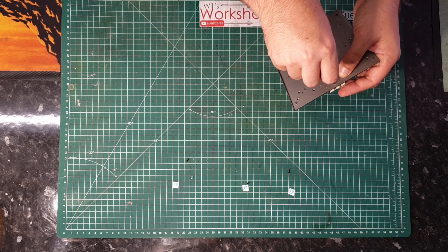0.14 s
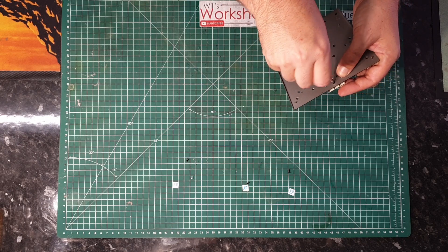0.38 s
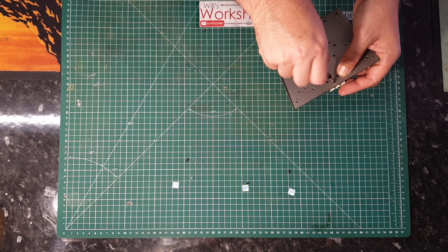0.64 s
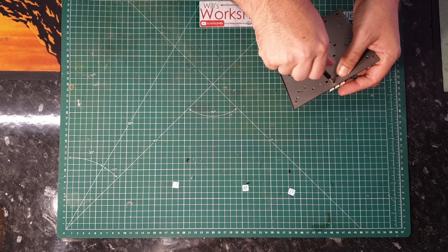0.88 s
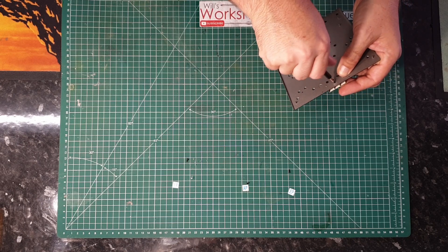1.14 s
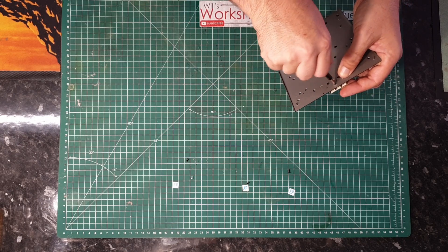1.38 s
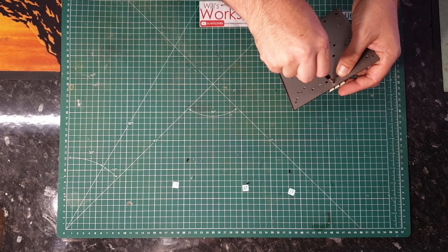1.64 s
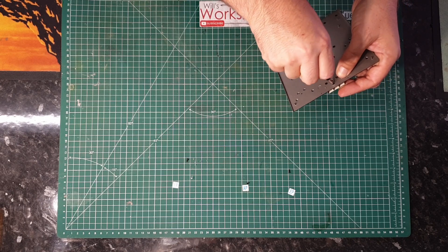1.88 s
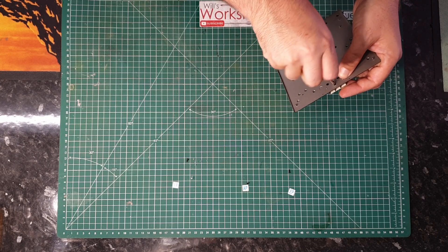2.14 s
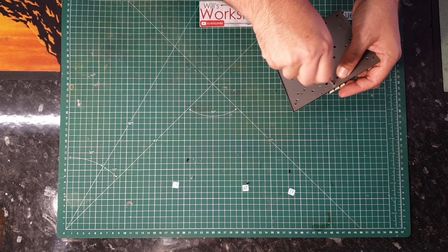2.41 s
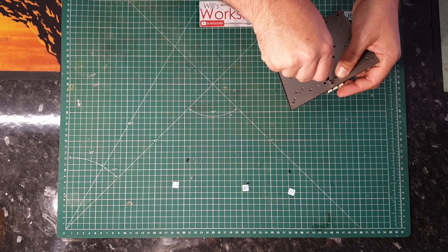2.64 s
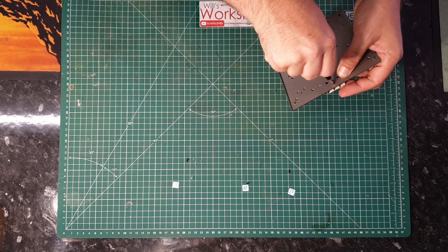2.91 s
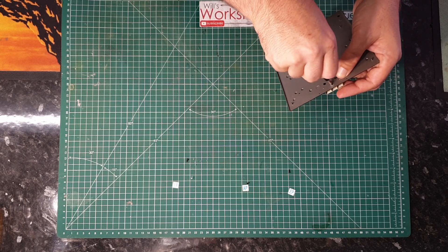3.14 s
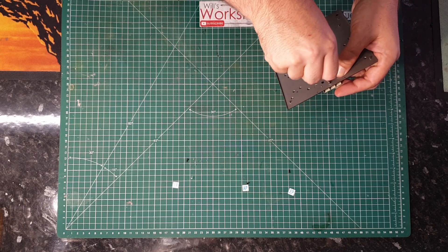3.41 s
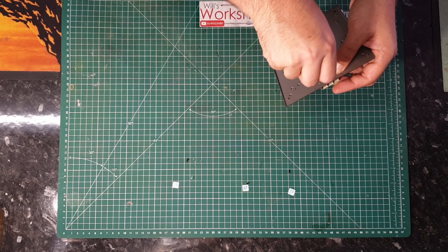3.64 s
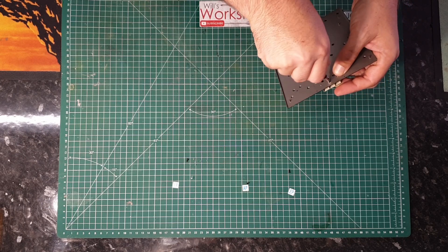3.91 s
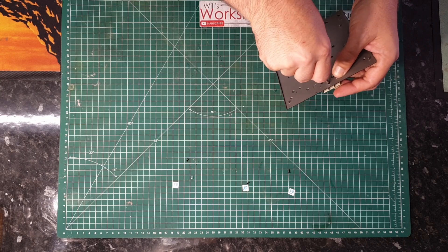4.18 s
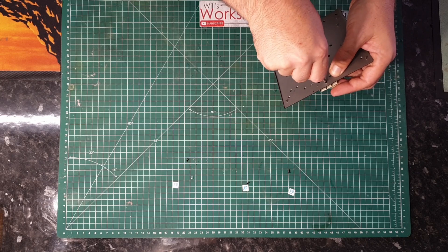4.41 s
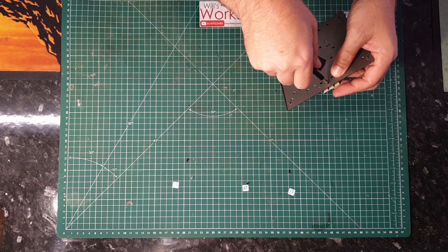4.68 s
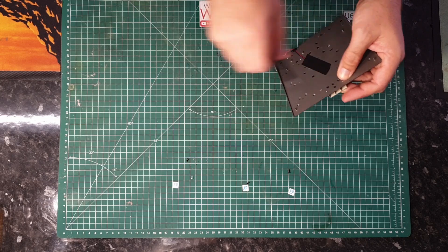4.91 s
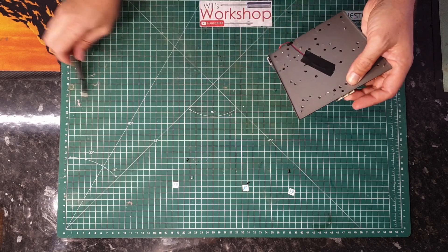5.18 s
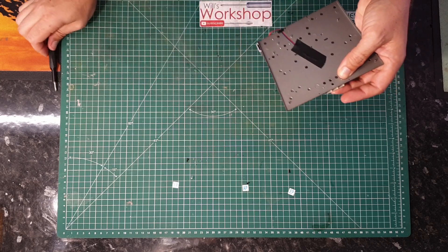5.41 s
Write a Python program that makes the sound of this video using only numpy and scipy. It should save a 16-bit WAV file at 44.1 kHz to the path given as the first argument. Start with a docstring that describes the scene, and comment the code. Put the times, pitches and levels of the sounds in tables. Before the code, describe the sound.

Over a low appliance hum, a hand tool quietly ticks and rubs on plastic, then lands loudly on a hard counter, rattling briefly.

```python
"""A room with a stone worktop: fingers turn a small screwdriver in a thin plastic panel on a cutting mat. Each
regrip ticks (noise burst), creaks and thuds (struck modes); rubbing is noise with one gliding squeak. The
driver drops on the worktop, bounces and rattles (modes and noise); then something drier clacks on the worktop.
An appliance hums (beating and wavering sines) and rumbles (noise); a small microphone adds hiss and colour."""
import sys
import numpy as np
from scipy import signal
from scipy.fft import rfft, irfft, next_fast_len
from scipy.io import wavfile

SR = 44100
rng = np.random.default_rng(int(sys.argv[2]) if len(sys.argv) > 2 else 0)


def to_wav(s):
    """Save 16-bit WAV."""
    ch = np.atleast_2d(s).T  # columns
    pcm = np.round(np.clip(ch, -1, 1) * 32767)  # PCM
    wavfile.write(sys.argv[1], SR, pcm.astype(np.int16))


def how_loud(loudness_db):
    """Turn decibels into a plain amplitude multiplier (0 dB gives 1, 20 dB gives 10)."""
    steps = np.asarray(loudness_db, float) / 20
    return 10 ** steps


N = 244578

# driver modes: f/Hz, level/dB, t60/s
DRIVER_MODES = [(160, -7, 0.065), (261, 9, 0.11), (350, 2, 0.035), (452, -4, 0.045), (1037, -13.5, 0.047),
                (1165, 1, 0.055), (1770, 5, 0.02), (1857, 5, 0.023), (1996, -2.5, 0.031), (2380, 4, 0.017),
                (2560, -16, 0.018), (2700, -4.5, 0.037), (3000, 7, 0.0071), (3270, -4, 0.018),
                (3970, -3.5, 0.025), (4304, -2, 0.033), (9140, -2, 0.014), (11100, 8.5, 0.0078)]
# dry crack of a blow, relative density: f/Hz, level/dB
CRACK_SPECTRUM = [(500, -3.5), (1000, -8.5), (2400, 1.5), (3500, -17), (4400, -3), (5600, -15), (7000, -13),
                  (8300, -12), (10000, 1.5), (11500, -6), (13000, -11), (15500, -16)]
BLOW_CHATTER_S = 0.0013   # mean delay of a blow's after-clicks


def rms_one(x):
    """Scales to rms 1."""
    return x / np.sqrt(np.mean(x ** 2) + 1e-20)


def in_time(rows):
    """Joins curve rows by straight lines, one value a sample."""
    s, *columns = np.transpose(rows)
    return [np.interp(np.arange(N) / SR, s, c) for c in columns]


def at_hz(points, hz):
    """Reads a table on a log-frequency axis."""
    table_hz, values = np.array(points)[:, :2].T
    return np.interp(np.log(hz), np.log(table_hz), values)


def coloured(spectrum, size=N):
    """Noise with the given spectrum, rms 1."""
    pad = next_fast_len(size)
    hz = np.maximum(np.arange(pad // 2 + 1) * SR / pad, 1)
    shaped = rfft(rng.standard_normal(pad)) * how_loud(at_hz(spectrum, hz))
    return rms_one(irfft(shaped, pad)[:size])


def lowpass_noise(cutoff_hz, shape):
    """Slow random wander: white noise through a second-order lowpass."""
    sos = signal.butter(2, cutoff_hz, fs=SR, output="sos")
    return signal.sosfilt(sos, rng.standard_normal(shape))


def ring(x, hz, t60_s):
    """Two-pole resonator: a unit click sets a sine of height 1 ringing."""
    r = how_loud(-60 / (t60_s * SR))
    w = 2 * np.pi * hz / SR
    return signal.lfilter([0, np.sin(w)], [1, -2 * r * np.cos(w), r * r], x + 1e-18)


def chatter(mean_delay_s, draw, first, count=12):
    """A contact is a first click and a few uneven, fading after-clicks; energy 1."""
    clicks = np.zeros(int(.03 * SR))
    when = np.minimum(draw[:count] * mean_delay_s * 2, .029) * SR
    heights = (draw[count:] - .5) * 2 * np.exp(-draw[:count])
    np.add.at(clicks, when.astype(int), heights)
    clicks[0] += first
    return clicks / np.sqrt(np.sum(clicks ** 2))


def strike(clicks, modes, spread_db):
    """One contact rings every mode with a strength of its own; peak 1."""
    x = np.concatenate([clicks, np.zeros(int(.15 * SR))])
    luck = rng.normal(0, 1, len(modes))
    sound = 0
    for k, (hz, db, t60_s) in enumerate(modes):
        sound = sound + (-1) ** k * how_loud(db + spread_db * luck[k]) * ring(x, hz, t60_s)
    return sound / np.max(np.abs(sound))


def grit(spectrum, fade_s, rise_s, snap=0):
    """Countless tiny fast-dying modes: coloured noise swells and fades, with optional snap; height about 1."""
    t = np.arange(int(.08 * SR)) / SR
    fade = np.exp(-t / fade_s) + snap * np.exp(-t / 0.002)
    shape = fade * (1 - np.exp(-t / rise_s))
    sound = coloured(spectrum, size=len(t)) * shape
    return sound * np.sqrt(np.sum(shape ** 2) / np.sum(sound ** 2)) / 2


def add(out, at, sound):
    """Mixes a sound in at a sample."""
    out[at:at + len(sound)] += sound[:N - at]


def regrips():
    """The bit slips in the screw head: the steel scrapes, the panel creaks, the mat thuds."""
    # regrips: t/s, steel level/dB, panel level/dB, mat level/dB, steel tick f/Hz
    ticks = [(0.38, -62.5, -56, -62.5, 10100), (0.471, -62.5, -56.5, -55, 10200),
             (0.6461, -66, -58, -56.5, 10900), (0.7228, -68, -59, -69, 10900),
             (0.9282, -55, -55, -50, 10720), (0.996, -65, -59.5, -70, 10400),
             (1.019, -58, -59.5, -71, 11100), (1.2035, -66, -59, -54.5, 10200),
             (1.289, -68, -61, -66, 11600), (1.305, -65, -53, -68, 10700), (1.4988, -57, -58.5, -56, 10500),
             (1.797, -65, -53, -56, 10600), (1.8055, -58, -58, -71, 10200),
             (1.871, -57.5, -52.5, -58, 9920), (2.102, -72, -49.5, -63, 9500),
             (2.1074, -53.5, -45.5, -50.5, 10600), (2.178, -59, -53, -73, 10000),
             (2.193, -67, -60, -65, 11200), (2.419, -68, -56, -78, 10100),
             (2.4301, -54.5, -53, -45.5, 9840), (2.494, -68, -59.5, -64, 9050),
             (2.513, -63, -60, -65, 10100), (2.7186, -67, -60, -54.5, 9490),
             (2.728, -58.5, -53, -51.5, 9600), (2.818, -66, -54.5, -68, 10600),
             (3.043, -59.5, -54.5, -49.5, 9400), (3.0553, -58.5, -57, -49.5, 11100),
             (3.3513, -70, -54.5, -55.5, 10300), (3.424, -68, -63, -58, 11100),
             (3.441, -76, -73, -55.5, 12000), (3.529, -66, -63, -72, 11100), (3.65, -70, -55, -69, 10700),
             (3.7099, -65, -59, -81, 10200), (3.726, -67, -62, -64, 10900), (4.004, -65, -54.5, -72, 12260),
             (4.0559, -76, -57, -65, 12550), (4.085, -78, -58, -53, 12000)]
    # panel modes under the screw: f/Hz, level/dB, t60/s
    panel_modes = [(1490, -5, 0.028), (1940, -10, 0.0067), (2040, -0.5, 0.011), (2326, 2, 0.028),
                   (2640, 6, 0.0081), (3320, -6, 0.041), (3700, -21, 0.031), (4300, -14.5, 0.012),
                   (4930, -8, 0.0096)]
    # mat modes under the screw: f/Hz, level/dB, t60/s
    mat_modes = [(265.6, -2, 0.056), (415, -5.5, 0.04), (476.5, -0.5, 0.056), (565, 5, 0.018),
                 (725, -5, 0.0054)]
    # panel creak, relative density: f/Hz, level/dB
    creak_spectrum = [(300, -25), (900, -4), (1500, -12.5), (2000, -2.5), (2400, 7), (3300, -2), (4000, -7),
                      (5200, -19), (7000, -20)]
    slip_chatter_s, scrape_fade_s, creak_fade_s = 0.0062, 0.021, 0.028
    creak_re_panel_db = -0.5
    out = np.zeros(N)
    draws = rng.random((len(ticks), 24))
    for (s, steel_db, panel_db, mat_db, hz), draw in zip(ticks, draws):
        at = round(s * SR)
        clicks = chatter(slip_chatter_s, draw, first=0.76)
        steel = [(0.45 * hz, -30), (0.79 * hz, -16), (0.9 * hz, 0),
                 (1.12 * hz, -1), (1.15 * hz, -10), (1.2 * hz, -14)]
        creak = grit(creak_spectrum, creak_fade_s, rise_s=0.0013)
        add(out, at, how_loud(steel_db) * grit(steel, scrape_fade_s, rise_s=0.0003, snap=1.66))
        add(out, at, how_loud(panel_db) * strike(clicks, panel_modes, spread_db=2.5))
        add(out, at, how_loud(panel_db + creak_re_panel_db) * creak)
        add(out, at, how_loud(mat_db) * strike(clicks, mat_modes, spread_db=2.0))
    return out


def drops():
    """Each blow weighs ring, clack, clank and treble in its own way; the thud goes with the ring."""
    # blows on the worktop: t/s, level/dB, then balance: ring/dB, clank/dB, treble/dB
    blows = [(5.174, -15.5, -8, -3, -12), (5.1788, -28, 1, -28, 0), (5.1847, -32, 1, -26, -1),
             (5.2153, -21, -7.5, -12, -14)]
    middle_db, thud_db, crack_db = -6.5, -9, -0.5
    middle = [m for m in DRIVER_MODES if 600 < m[0] < 1300]
    low = [m for m in DRIVER_MODES if m[0] < 600]
    out = np.zeros(N)
    draws = rng.random((len(blows), 24))
    for (s, db, ring_db, clank_db, treble_db), draw in zip(blows, draws):
        tilt = [(700, ring_db), (1300, ring_db), (1600, 0), (3300, 0),
                (3800, clank_db), (6000, clank_db), (8000, treble_db)]
        at = round(s * SR)
        clicks = chatter(BLOW_CHATTER_S, draw, first=3.3)
        upper = [(f, d + at_hz(tilt, f), t) for f, d, t in DRIVER_MODES if f > 1300]
        crack = [(f, d + at_hz(tilt, f)) for f, d in CRACK_SPECTRUM]
        add(out, at, how_loud(db) * strike(clicks, upper, spread_db=-0.6))
        add(out, at, how_loud(db + ring_db + middle_db) * strike(clicks, middle, spread_db=1.5))
        add(out, at, how_loud(db + ring_db + thud_db) * strike(clicks, low, spread_db=1.0))
        add(out, at, how_loud(db + crack_db) * grit(crack, 3.5 * BLOW_CHATTER_S, rise_s=0.00048))
    return out


def rattling():
    """After a blow the driver rattles on: it sets in, sags while it holds, then dies quickly."""
    # rattle onsets: t/s
    starts_s = [5.18, 5.212, 5.381, 5.416, 5.45]
    # rattles, one an onset: level/dB, hold/s, upper band balance/dB
    rattles = [(-64, .03, 0), (-43, 0.046, 10), (-53.5, 0.014, -17), (-43.5, 0.006, 4.5), (-56.5, 0.092, 0)]
    rise_s, sag_db_per_s, stop_db_per_s = 0.0041, 134, 404
    grains = (rng.random(N) < 1500 / SR) * rng.standard_normal(N)   # about 1500 contacts/s
    modes = [m for m in DRIVER_MODES if 900 < m[0] < 5000]
    ringing = rms_one(sum(how_loud(d) * ring(grains, f, t60_s) for f, d, t60_s in modes))
    scuff = coloured([(f, d - 15.0 * (f > 5000)) for f, d in CRACK_SPECTRUM])
    upper = coloured([(1900, -27), (2500, -1.0), (3200, 0.5), (4500, -9), (5500, -14.5), (6500, -24)])
    out = 0
    for s, (db, hold_s, upper_db) in zip(starts_s, rattles):
        t = np.maximum(np.arange(N) / SR - s, 0)
        sag_db = sag_db_per_s * np.minimum(t, hold_s)
        stop_db = stop_db_per_s * np.maximum(t - hold_s, 0)
        envelope = how_loud(db - sag_db - stop_db) * np.minimum(t / rise_s, 1)
        out = out + envelope * (0.44 * ringing + 0.58 * scuff + 0.45 * how_loud(upper_db) * upper)
    return out


def clacks():
    """Something drier clacks on the worktop: a light touch, then a clack with two rebounds."""
    # contacts: t/s, level/dB, crack re level/dB
    contacts = [(5.3817, -46, 8.5), (5.4153, -27, -0.5), (5.42, -31, 1), (5.4287, -44.5, 3)]
    # clack modes: f/Hz, level/dB, t60/s
    clack_modes = [(288, -8, 0.036), (485, -6.5, .04), (998, -2.5, 0.028), (1663, -4.5, .03),
                   (2160, -6, 0.022), (2370, -0.5, .03), (3190, -3, 0.03), (3940, 0.5, 0.033),
                   (4700, -11, .02), (5660, -1.5, 0.017)]
    out = np.zeros(N)
    draws = rng.random((len(contacts), 24))
    for (s, db, crack_db), draw in zip(contacts, draws):
        at = round(s * SR)
        clicks = chatter(BLOW_CHATTER_S, draw, first=3.4)
        add(out, at, how_loud(db) * strike(clicks, clack_modes, spread_db=2.0))
        add(out, at, how_loud(db + crack_db) * grit(CRACK_SPECTRUM, 0.0052, rise_s=0.00028))
    return out


def rubbing():
    """Skin drags over the panel; once the thread binds and squeaks, a narrow band of noise gliding up."""
    # finger rubbing: t/s, level/dB
    rub_level = [(0, -72), (.45, -68.5), (.5, -66.5), (.8, -70.5), (1.6, -70), (2.15, -73), (2.32, -69),
                 (2.9, -72.5), (3.15, -67), (3.36, -71), (3.93, -71), (5.15, -75)]
    # rubbing, relative density: f/Hz, level/dB
    rub_spectrum = [(900, -35), (1400, -2), (1950, -14.5), (2200, 1), (2400, 4), (2650, -2.5), (3050, -0.5),
                    (3500, -16), (4300, -24), (6000, -31.5)]
    # thread squeak: t/s, f/Hz, level/dB
    squeak_curve = [(.52, 3350, -90), (.56, 3450, -77), (.63, 3520, -71.5), (.69, 3600, -73.5),
                    (.73, 3620, -85)]
    squeak_hz, squeak_db = in_time(squeak_curve)
    wobble = lowpass_noise(110, (2, N))
    phase = 2 * np.pi * np.cumsum(squeak_hz) / SR
    squeak = rms_one(wobble[0] * np.sin(phase) + wobble[1] * np.cos(phase))
    patchy_db = 1.4 * rms_one(lowpass_noise(9.0, N))   # uneven pressure
    rub = how_loud(in_time(rub_level)[0] + patchy_db) * coloured(rub_spectrum)
    return rub + how_loud(squeak_db) * squeak


def appliance():
    """The rotor runs just under half mains speed, so their lines beat; others waver over a broad rumble."""
    # mains lines: multiple of mains, peak level/dB
    mains_lines = [(1, -62), (2, -57.5)]
    # rotor lines: multiple of rotor speed, peak level/dB
    rotor_lines = [(2, -63), (4, -66)]
    # rotor's third line swells and fades: t/s, rms level/dB
    third_line = [(0, -63), (.2, -64), (.47, -81), (.75, -66), (2.4, -66), (3.2, -73), (4.4, -70),
                  (5.0, -60), (5.2, -59), (5.38, -50.5), (5.47, -66), (5.55, -66)]
    # wavering lines: f/Hz, level/dB, pole width/Hz
    wavering_lines = [(120.7, -68.5, 1.3), (193.1, -70.5, 2.9), (286.6, -74.5, 2.2)]
    # rumble, relative density: f/Hz, level/dB
    rumble_spectrum = [(13, -29), (24, -20), (38, -4.5), (102, -3), (151, -7.5), (289, -11.5), (325, -11.5),
                       (422, -16.5), (480, -20), (700, -24.5), (910, -51), (1540, -120)]
    # rumble: t/s, level/dB
    rumble_level = [(0, -58.5), (.41, -63.5), (.74, -57.5), (1.08, -64.5), (1.31, -60.5), (2.61, -61.5),
                    (2.8, -67), (3.1, -62.5), (4.05, -60), (4.32, -66), (4.7, -63), (5.55, -58.5)]
    mains_hz, rotor_hz = 50.0, 24.565
    cancel_s = 0.49   # rotor and mains lines stand opposed here
    phase = 2 * np.pi * (np.arange(N) / SR - cancel_s)   # of 1 Hz
    hum = sum(how_loud(db) * np.sin(k * mains_hz * phase) for k, db in mains_lines)
    hum = hum - sum(how_loud(db) * np.sin(k * rotor_hz * phase) for k, db in rotor_lines)
    hum = hum + np.sqrt(2) * how_loud(in_time(third_line)[0]) * np.sin(rotor_hz * phase * 3)
    for hz, db, width_hz in wavering_lines:
        r = np.exp(-np.pi * width_hz / SR)
        noise = rng.standard_normal((2, N + SR))
        waver = signal.lfilter([1], [1, -2 * r, r * r], noise)[:, SR:]   # first second settles
        waver = 0.46 * waver / np.std(waver)
        hum = hum + how_loud(db) * ((1 + waver[0]) * np.sin(hz * phase) + waver[1] * np.cos(hz * phase))
    return hum + how_loud(in_time(rumble_level)[0]) * coloured(rumble_spectrum)


def hiss():
    """Steady microphone hiss: coloured noise."""
    # hiss, relative density: f/Hz, level/dB
    hiss_spectrum = [(290, -23.5), (500, -1.5), (561, -6), (586, 0.5), (648, -8.5), (749, -3.5),
                     (1370, -13.5), (1630, -10), (2240, -11), (3210, -11), (5100, -22.5), (7000, -31),
                     (8820, -26), (12100, -17), (15700, -20)]
    return how_loud(-68.5) * coloured(hiss_spectrum)


def microphone_port(x):
    """The sound port loses a broad band near 7 kHz."""
    sos = signal.butter(1, [6000, 8000], "bandstop", fs=SR, output="sos")
    return 0.63 * signal.sosfilt(sos, x) + 0.34 * x


def room(x):
    """Dense echoes after a few milliseconds, each band dying at its own rate; echo energy 1."""
    # reverberation: f/Hz, t60/s
    room_t60 = [(200, 0.2), (500, 0.39), (1400, 0.2), (3700, 0.21), (10000, 0.24)]
    t = np.arange(int(.5 * SR)) / SR
    edges_hz = 100 * 2.0 ** np.arange(8.3)   # octaves
    tail = 0
    for low, high in zip(edges_hz, np.minimum(edges_hz[1:], .45 * SR)):
        sos = signal.butter(2, [low, high], "band", fs=SR, output="sos")
        band = signal.sosfilt(sos, rng.standard_normal(len(t)))
        tail = tail + band * how_loud(-60 * t / at_hz(room_t60, np.sqrt(low * high)))
    tail = tail * np.clip((t - .003) / 0.0073, 0, 1)
    return signal.fftconvolve(x, tail / np.sqrt(np.sum(tail ** 2)))[:N]


def scene():
    """Contacts ring in the room over rubbing, hum and hiss."""
    room_db = -6.5
    contacts = microphone_port(regrips() + drops() + clacks() + rattling())
    mix = contacts + how_loud(room_db) * room(contacts) + rubbing() + appliance() + hiss()
    return mix[None]


def top_cut(x):
    """Nothing passes above the cut-off."""
    return signal.sosfilt(signal.butter(12, 16510, fs=SR, output="sos"), x)


def record(dry):
    """Filters cut the top above 15.72 kHz and the bass below 35 Hz."""
    lowpass = signal.ellip(10, .5, 60, 15720, fs=SR, output="sos")
    highpass = signal.butter(2, 35, "high", fs=SR, output="sos")
    mix = signal.sosfilt(highpass, signal.sosfilt(lowpass, dry))
    return top_cut(mix)


dry = scene()
out = record(dry)
to_wav(out)
```